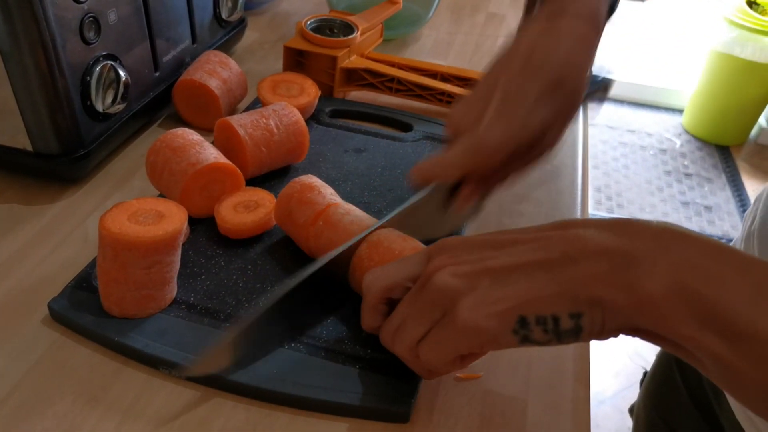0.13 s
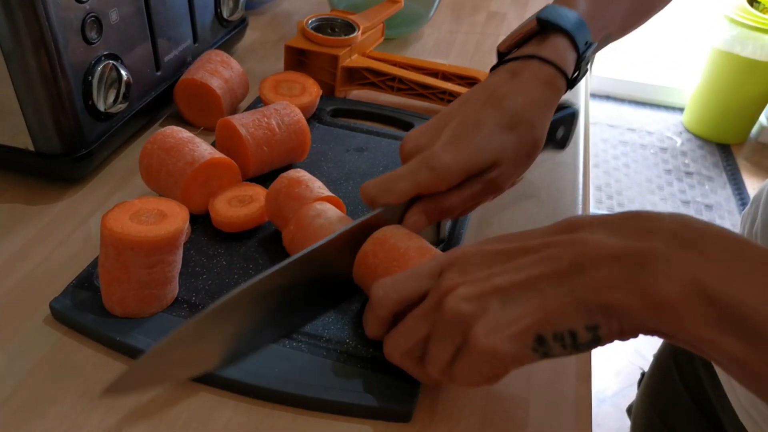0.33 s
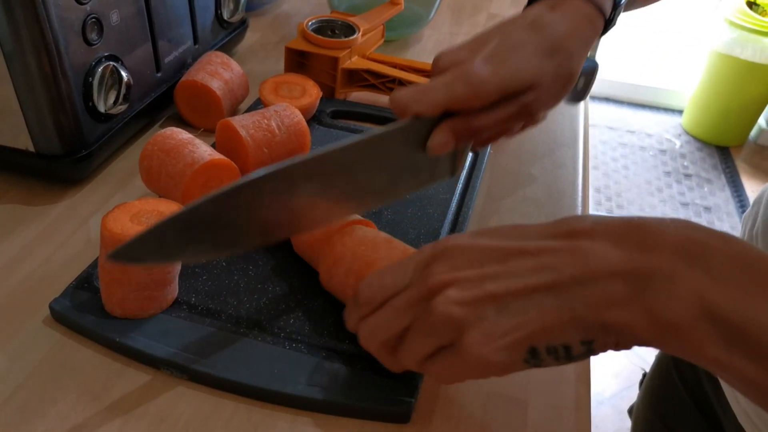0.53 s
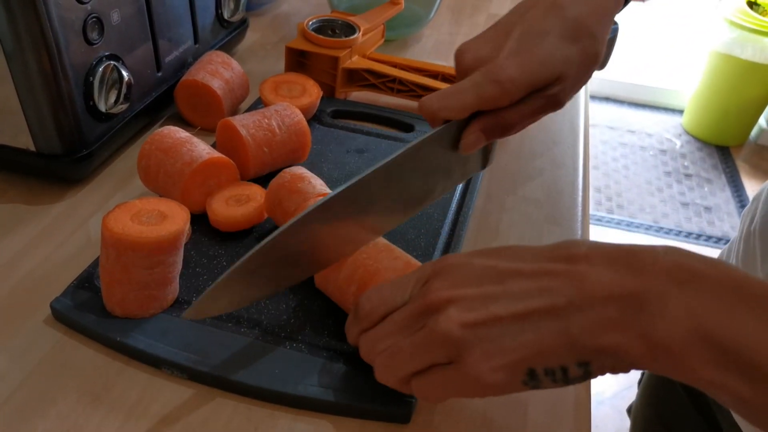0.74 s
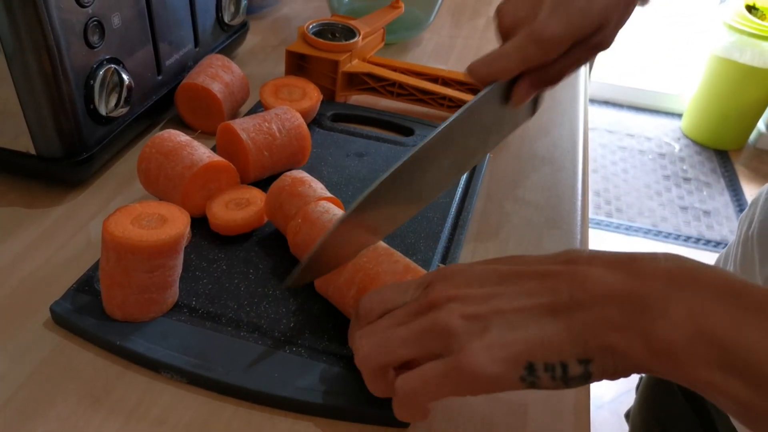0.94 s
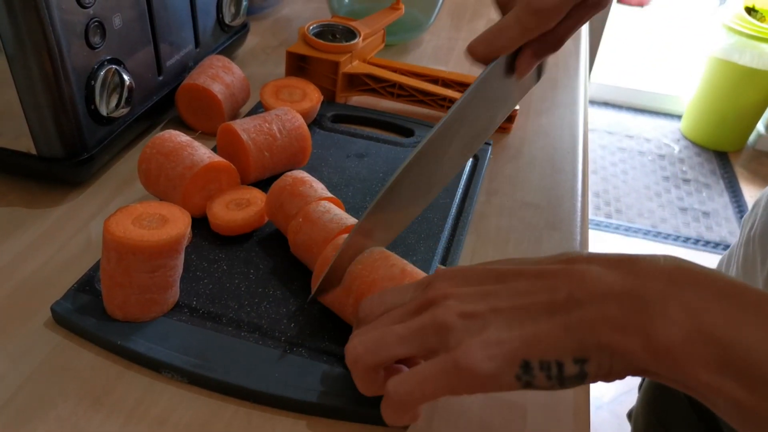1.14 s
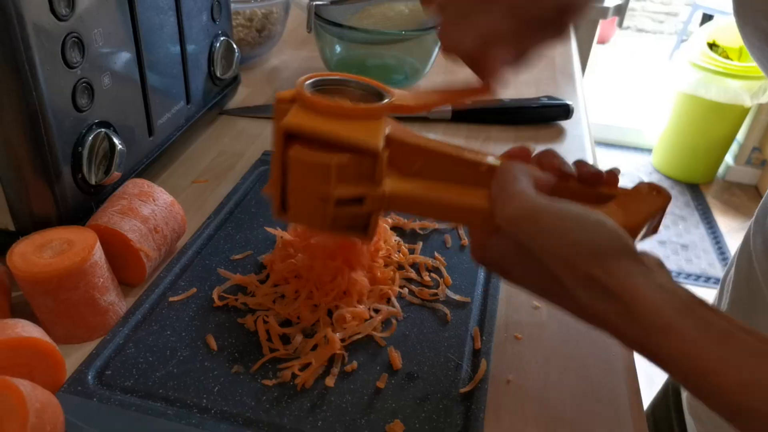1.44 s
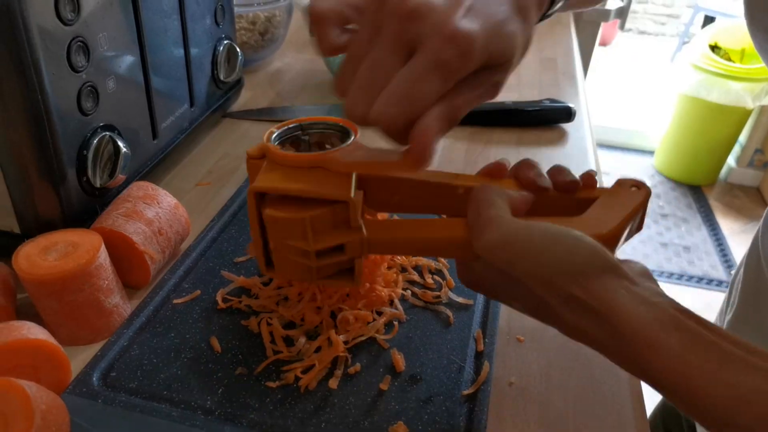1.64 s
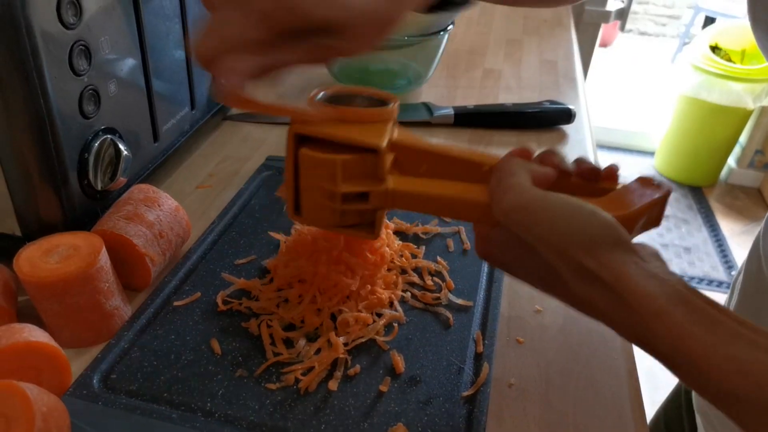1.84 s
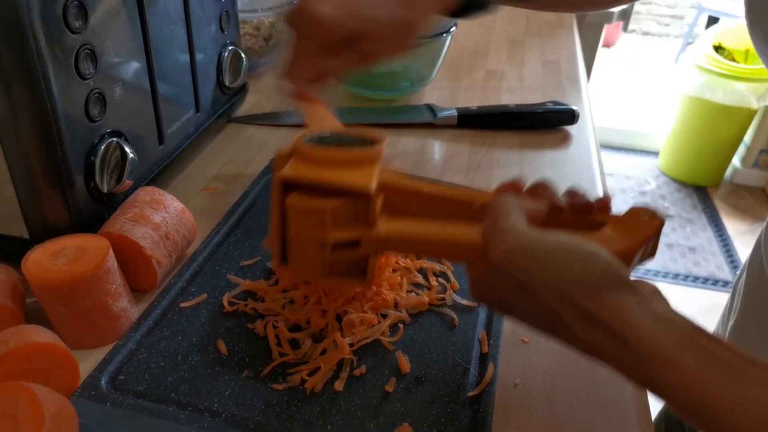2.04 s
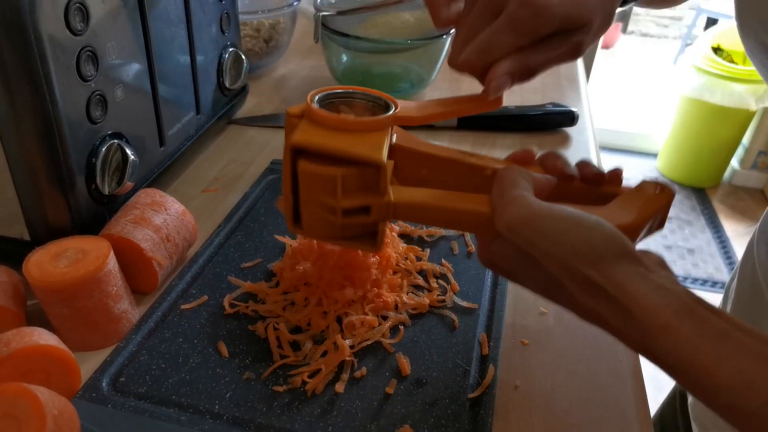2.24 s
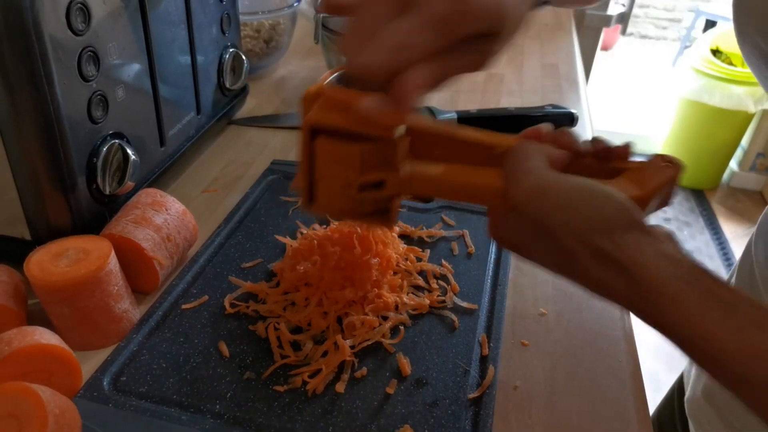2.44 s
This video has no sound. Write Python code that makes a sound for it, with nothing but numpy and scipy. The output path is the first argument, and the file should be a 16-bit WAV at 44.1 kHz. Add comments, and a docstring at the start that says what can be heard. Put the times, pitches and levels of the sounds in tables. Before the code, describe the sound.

Raw carrot creaks and snaps under a knife twice, with a knock on the plastic board between. The sound breaks off, then a hand-turned grater scrapes out hissing shreds in quick pulses, heard close up in a quiet kitchen.

```python
"""A kitchen knife creaks through a raw carrot, tearing cells until it splits, and knocks on a plastic board.
The piece tumbles away; the blade ticks, sinks in again and splits the next piece, and the sound breaks off.
After a silence a hand-cranked drum grater rasps through carrot in uneven surges, its teeth rattling
the hollow housing and tearing off hissing shreds. Both sound in a small kitchen with a low hush."""
import sys
import numpy as np
from scipy import signal
from scipy.fft import rfft, irfft
from scipy.io import wavfile

SR = 44100
rng = np.random.default_rng(int(sys.argv[2]) if len(sys.argv) > 2 else 0)


def inscribe(sig):
    """Save sig as 16-bit PCM at rate SR to the path in sys.argv[1].

    A 1-D sig is mono; a 2-D sig holds one channel per row.
    Samples are clipped to [-1, 1] before scaling.
    """
    pcm = np.round(np.clip(np.atleast_2d(sig).T, -1, 1) * 32767)
    wavfile.write(sys.argv[1], SR, pcm.astype(np.int16))


N = 114660
T = np.arange(N) / SR
HZ = np.fft.rfftfreq(2 * N, 1 / SR)


def amp(db):
    """Decibels to gain."""
    return 10 ** (np.asarray(db) / 20)


def unit(x):
    """Scales to rms 1."""
    return x / np.sqrt(np.mean(x ** 2) + 1e-20)


def read(points, hz=HZ):
    """Interpolates a table over log frequency."""
    freqs, values = np.transpose(points)
    return np.interp(np.log(hz + 1), np.log(freqs + 1), values)


def level(points):
    """Time table in dB to gain per sample."""
    times, db = np.transpose(points)
    return amp(np.interp(T, times, db))


def shape(x, gain):
    """Filters by a gain per frequency."""
    return irfft(rfft(x, 2 * N) * gain)[..., :N]


def colour(x, points):
    """Minimum-phase filter: rings after a click, never before."""
    log_gain = np.log(amp(read(points)))
    mirrored = np.concatenate([log_gain, log_gain[-2:0:-1]])
    return shape(x, np.exp(np.conj(signal.hilbert(mirrored)))[:N + 1])


# stereo coherence (frequency [Hz], left-right correlation [0..1])
COHERENCE = [(150, 0.91), (700, 0.93), (1600, 0.36), (6000, .15)]
def widen(pair):
    """Makes two independent signals alike in the bass."""
    same = read(COHERENCE)
    mid = shape(pair[0], np.sqrt((1 + same) / 2))
    side = shape(pair[1], np.sqrt((1 - same) / 2))
    return np.array([mid + side, mid - side])


def noise(points):
    """Steady coloured stereo noise."""
    return unit(colour(widen(rng.standard_normal((2, N))), points))


def blow(start_s, t60_s, rise_s=0.0009, hold_s=0):
    """Impact envelope: quick rise, optional hold, exponential decay."""
    age = np.maximum(T - start_s, 0)
    return (1 - np.exp(-age / rise_s)) * 1000. ** (-np.maximum(age - hold_s, 0) / t60_s)


def ring(start_s, modes, rise_s, hold_s=0):
    """Decaying modes of a struck body."""
    return -sum(amp(db) * blow(start_s, t60_s, rise_s, hold_s) * np.sin(2 * np.pi * hz * (T - start_s))
                for hz, db, t60_s in modes)


def grains(per_s, spread_db):
    """Random tiny fractures, a few much larger than the rest."""
    size = amp(spread_db * np.minimum(rng.exponential(1, N), 4))
    return unit(size * rng.choice([-1, 1], N) * (rng.random(N) < per_s / SR))


# background spectrum (frequency [Hz], density [dB])
HUSH_SPECTRUM = [(20, 4.5), (45, -1.5), (100, 4.5), (160, -11), (300, -9.5), (600, -18.5), (4000, -29),
                 (8000, -29), (10000, -43), (15000, -45)]
def hush():
    """Steady low background noise."""
    return amp(-65) * noise(HUSH_SPECTRUM)


# room decay (frequency [Hz], t60 [s])
ROOM_DECAY = [(100, 0.34), (300, 0.3758), (3000, 0.3151), (7000, 0.25), (14000, 0.46)]
# colour of the reflections (frequency [Hz], gain [dB])
ROOM_EQ = [(60, -7), (250, -1.5), (600, -3), (1200, -0.5), (2200, -2), (4000, 0.5), (8000, 0.5),
           (14000, -6.5)]
def kitchen(x):
    """Dense reflections from counter and walls, each band dying at its own rate."""
    onset = np.clip((T - .004) / 0.003, 0, 1)
    echoes = widen(rng.choice([-1., 1.], (2, N)) * (rng.random((2, N)) < .1)) * onset
    hz, t, bands = signal.stft(echoes[:, :SR], SR, nperseg=256)
    decay = 1000. ** (-t / read(ROOM_DECAY, hz)[:, None])
    tail = signal.istft(bands * decay, SR, nperseg=256)[1]
    tail /= np.linalg.norm(tail, axis=1, keepdims=True)
    return colour(signal.fftconvolve(x, tail, axes=1)[:, :N], ROOM_EQ)


def teeth(per_s, spread_db, left_lead_s=0.0001, scatter=0.49):
    """Grains from the drum, earlier on the left; as it turns, each scatters differently in the housing."""
    direct = grains(per_s, spread_db)
    pair = np.array([direct, shape(direct, np.exp(-2j * np.pi * HZ * left_lead_s))])
    energy = abs(signal.fftconvolve(direct ** 2, blow(0, t60_s=0.015) ** 2)[:N])
    bounced = unit(np.sqrt(energy) * rng.standard_normal((2, N)))
    return np.sqrt(1 - scatter) * pair + np.sqrt(scatter) * bounced


# housing response (frequency [Hz], gain [dB])
HOUSING_EQ = [(60, -36.5), (280, -20.5), (450, -32), (780, -14.5), (1150, -19.5), (1600, -10), (2300, -5.5),
              (3450, -1), (4200, -15), (6000, -13.5), (15000, -51)]
# its hollow resonances (frequency [Hz], boost [dB])
CAVITY_PEAKS = [(2020, 8), (2660, 6.5), (3220, 5)]
def rasping(half_width_hz=52):
    """Teeth rattle the hollow housing."""
    hollow = amp(sum(db / (1 + ((HZ - hz) / half_width_hz) ** 2) for hz, db in CAVITY_PEAKS))
    return unit(shape(colour(teeth(per_s=3000, spread_db=2.35), HOUSING_EQ), hollow))


def focus(centre_hz, lift_db=4, width_hz=420):
    """Broad lift where the teeth excite the housing most."""
    return amp(lift_db * np.exp(-((HZ - centre_hz) / width_hz) ** 2))


# tooth catches (time [s], level [dB])
TOOTH_CATCHES = [(1.8092, -30.5), (1.8205, -30), (1.923, -40.5), (2.4434, -30.5), (2.5084, -36.5)]
def catching(rasp):
    """Teeth catch and jolt the housing."""
    jolts = rasp * sum(amp(db) * blow(s, t60_s=0.042) for s, db in TOOTH_CATCHES)
    return shape(jolts, amp(-4) * focus(3030, lift_db=8))


def surge(start_s, peak_s, end_s, start_db, end_db=-17, rise_s=0.0065, arch=2.34):
    """The teeth bite at once; pressure swells to a peak and falls away."""
    before = np.clip((peak_s - T) / (peak_s - start_s), 0, 1)
    after = np.maximum((T - peak_s) / (end_s - peak_s), 0)
    onset = np.clip((T - start_s) / rise_s, 0, 1)
    return onset * amp(start_db * before ** arch + end_db * after ** arch)


# hiss of shreds, crunch of a deep bite (frequency [Hz], density [dB])
SHRED_SPECTRUM = [(1000, -20), (4000, -2), (5300, 4.5), (6600, -5.5), (7300, 2), (7800, 7), (8400, -2.5),
                  (10000, -13), (15000, -14.5)]
BITE_SPECTRUM = [(350, -25), (620, -8), (1000, -14.5), (1500, -1.5), (2500, 4.5), (4500, -6), (12000, -39)]
# drum surges (start [s], peak [s], end [s], rasp [dB], hiss [dB], crunch [dB],
# start level re peak [dB], rasp centre [Hz])
DRUM_SURGES = [(1.764, 1.797, 1.893, -34.5, -41, -43.5, -11.5, 2750),
               (1.92, 1.972, 2.042, -34, -41, -52.5, -11, 3200),
               (2.057, 2.162, 2.269, -34.5, -39, -46.5, -14.5, 3050),
               (2.233, 2.307, 2.3854, -34.5, -38.5, -37, -21.5, 2730),
               (2.438, 2.512, 2.602, -36, -38, -38.5, -12, 2651)]
def grating(clump_s=0.0065, clump_db=1):
    """The turning drum rasps and tears off hissing shreds; at full pressure the carrot crunches."""
    flutter = unit(shape(rng.standard_normal(N), np.exp(-(HZ * clump_s) ** 2)))
    clumps = unit(amp(clump_db * flutter))
    rasp = rasping()
    hiss = unit(colour(teeth(per_s=6800, spread_db=3.2), SHRED_SPECTRUM))
    crunch = unit(colour(teeth(per_s=1600, spread_db=2.35), BITE_SPECTRUM))
    out = catching(rasp)
    for start_s, peak_s, end_s, rasp_db, hiss_db, crunch_db, start_db, centre_hz in DRUM_SURGES:
        effort = surge(start_s, peak_s, end_s, start_db)
        out += amp(rasp_db) * effort * clumps * unit(shape(rasp, focus(centre_hz)))
        out += amp(hiss_db) * effort ** 1.2 * hiss
        out += amp(crunch_db) * effort ** 6.4 * crunch
    return out


# carrot groans (peak [s], half length [s], centre [Hz], level [dB])
WEDGE_GROANS = [(.2, .1, 335, -55), (1.315, 0.092, 215, -55)]
def groaning(width_oct=0.34):
    """The blade sticks and slips in the cut: a low swell before each split."""
    slips = widen(rng.standard_normal((2, N)))
    out = 0
    for peak_s, half_s, hz, db in WEDGE_GROANS:
        band = np.exp(-(np.log2((HZ + 1) / hz) / width_oct) ** 2)
        swell = np.exp(-((T - peak_s) / half_s) ** 2)
        out += amp(db) * swell * unit(shape(slips, band))
    return out


# tick of the edge, thud beneath it (frequency [Hz], density [dB])
TICK_SPECTRUM = [(1000, -18), (1500, -1.5), (3000, 0.5), (8000, 1.5), (9500, -13.5), (15000, -19)]
TICK_THUD_SPECTRUM = [(50, -8), (110, 1.5), (170, -10.5), (300, -25.5), (2000, -48.5)]
def tapping(start_s=.853, echo_s=.0015):
    """The edge nicks the skin with a tick, reflected by the board, which then takes the weight."""
    nick = blow(start_s, t60_s=0.066) * noise(TICK_SPECTRUM)
    tick = shape(nick, 1 + .5 * np.exp(-2j * np.pi * HZ * echo_s))
    thud = blow(start_s, t60_s=0.22, rise_s=0.0089) * noise(TICK_THUD_SPECTRUM)
    return amp(-45.5) * tick + amp(-50) * thud


# blade pressure (time [s], relative level [dB])
BLADE_PRESSURE = [(0, -56.5), (.06, -72.5), (.11, -55), (.15, -45), (.195, -34.5), (.209, -40),
                  (.22, -53.5), (.24, -47.5), (.251, -39), (.275, -47.5), (.3, -75.5), (.58, -73),
                  (.62, -94), (.85, -81), (1.015, -76.5), (1.04, -68.5), (1.18, -67), (1.218, -55),
                  (1.266, -55.5), (1.276, -44), (1.32, -41.5), (1.328, -34.5), (1.36, -47), (1.42, -120)]
# tearing cells (frequency [Hz], density [dB])
CELL_SPECTRUM = [(40, -30.5), (300, -10.5), (1100, -13), (1900, -5), (4900, -6), (5750, 3), (6800, -3.5),
                 (7950, 1), (8900, -14), (11000, -18.5), (15000, -23.5)]
def slicing():
    """Cells tear ahead of the blade, louder as it is pressed."""
    cells = widen([grains(per_s=8600, spread_db=2.5) for _ in range(2)])
    return amp(1.5) * level(BLADE_PRESSURE) * unit(colour(cells, CELL_SPECTRUM))


# board and blade modes (frequency [Hz], level [dB], t60 [s])
BOARD_MODES = [(133, -18.5, 0.15), (269.4, -11.5, .1), (363.8, -15.5, 0.065), (619, -2, 0.05),
               (866, -14, .05), (1047, -7, 0.04), (1230, -2, 0.055), (1855, -8.5, 0.026),
               (2190, -10.5, 0.03), (2836, -12.5, 0.04)]
BLADE_MODES = [(4910, -11, 0.051), (5693, 0.5, 0.06), (7930, -8.5, 0.027)]
# contact noise, counter thud (frequency [Hz], density [dB])
CLACK_SPECTRUM = [(50, -21.5), (250, -4.5), (450, -9.5), (620, 0), (1200, -0.5), (2200, -3), (3500, -11),
                  (8000, -17.5), (9500, -36.5), (15000, -50.5)]
THUD_SPECTRUM = [(20, -25.5), (60, -12), (120, -1), (250, -2), (420, -6), (900, -28), (3000, -53.5)]
# blade, then tumbling piece, on the board (time [s], level [dB], low-pass [Hz], thud [dB], blade [dB])
BOARD_KNOCKS = [(.281, -15.5, 2630, -29.5, -33), (0.2896, -11.5, 2620, -38, -28.5),
                (.294, -17, 8000, -51, -25.5), (0.4644, -29.5, 1900, -55.5, -57.5),
                (0.595, -51, 480, -44.5, -84)]
def knocking(rise_s=0.00097):
    """Knocks ring board and blade, returned separately; softer contacts are duller."""
    clack, thud = noise(CLACK_SPECTRUM), noise(THUD_SPECTRUM)
    board = blade = 0
    for s, db, cutoff_hz, thud_db, blade_db in BOARD_KNOCKS:
        hit = ring(s, BOARD_MODES, rise_s) + amp(-0.5) * blow(s, t60_s=0.046) * clack
        pole = np.exp(-2 * np.pi * cutoff_hz / SR)
        board += amp(db) * signal.lfilter([1 - pole], [1, -pole], hit)
        board += amp(thud_db) * blow(s, t60_s=0.21, rise_s=0.0054) * thud
        blade += amp(blade_db) * ring(s, BLADE_MODES, rise_s)
    return board, blade


# carrot modes (frequency [Hz], level [dB], t60 [s])
CARROT_MODES = [(598, -10.5, 0.03), (841, -14.5, 0.038), (1241, -7.5, 0.06), (1274.6, -2.5, 0.02),
                (1475, -8.5, 0.027), (1857, -7.5, 0.027), (2252, -8.5, 0.026), (2450, -12.5, .025)]
# crunch, low push of the parting halves (frequency [Hz], density [dB])
CRUNCH_SPECTRUM = [(50, -28.5), (250, -0.5), (700, -9.5), (1300, -5.5), (2300, -3.5), (3100, -12.5),
                   (5200, -11), (6500, -26.5), (8000, -29), (10000, -38.5), (15000, -44)]
PUSH_SPECTRUM = [(30, -36), (90, -15.5), (170, -2), (330, -3.5), (750, -7.5), (1200, -23.5), (4000, -51.5)]
# splits (time [s], ring [dB], crunch [dB], push [dB])
CARROT_SPLITS = [(0.207, -18, -28.5, -34), (1.3408, -17.5, -21, -26)]
def splitting(rise_s=0.0012, crack_s=.006):
    """The wedged carrot pops open; ring and crunch hold while the crack runs through it."""
    crunch, push = noise(CRUNCH_SPECTRUM), noise(PUSH_SPECTRUM)
    out = np.zeros((2, N))
    for s, ring_db, crunch_db, push_db in CARROT_SPLITS:
        out += amp(ring_db) * ring(s, CARROT_MODES, rise_s, hold_s=crack_s)
        out += amp(crunch_db) * blow(s, t60_s=0.062, hold_s=crack_s) * crunch
        out += amp(push_db) * blow(s, t60_s=0.15, rise_s=rise_s) * push
    return out


def place(x, pan):
    """Pans each frequency at constant power."""
    sides = amp(np.array([[.5], [-.5]]) * read(pan))
    return shape(x, sides / np.sqrt((sides ** 2).mean(0)))


# stereo balance (frequency [Hz], left minus right [dB])
GRATER_BALANCE = [(200, -3.5), (700, -2), (1300, -3), (2100, -7), (3200, -13), (4300, 1.5), (5500, 2.5),
                  (8000, 12.5), (15000, 10)]
KNIFE_BALANCE = [(200, 1.5), (700, 3.5), (1300, 2.5), (2200, -2.5), (5500, -5.5), (8000, 10), (15000, -5.5)]
def scene():
    """Knife, then grater, in the kitchen with its low hush."""
    cut = slicing() + groaning()
    snap = splitting()
    board, blade = knocking()
    knock = board + tapping()
    grate = grating()
    room_send = amp(-8) * cut + amp(-2) * snap + amp(-4) * knock + amp(-11) * blade
    knife = place(cut + snap + knock + blade + kitchen(room_send), KNIFE_BALANCE)
    grater = place(grate, GRATER_BALANCE) + amp(-12) * kitchen(grate)
    return knife + grater + hush()


# silence between cutting and grating (time [s], gain [dB])
PAUSE_GATE = [(1.3615, 0), (1.364, -15), (1.376, -20), (1.392, -38), (1.41, -110), (1.762, -110),
              (1.769, 0)]
def record(dry, cutoff_hz=15200):
    """Mutes everything between the two tasks, then limits the band."""
    lowpass = signal.firwin(401, cutoff_hz, window=("kaiser", 9), fs=SR)
    return signal.oaconvolve(dry * level(PAUSE_GATE), lowpass[None], "same")


dry = scene()
out = record(dry)
inscribe(out)
```